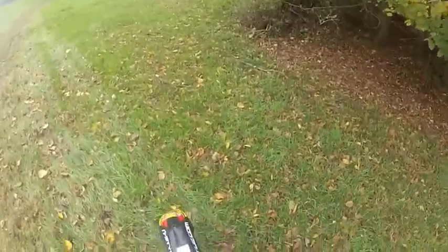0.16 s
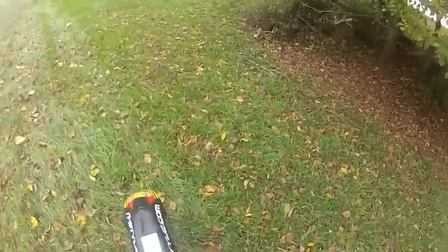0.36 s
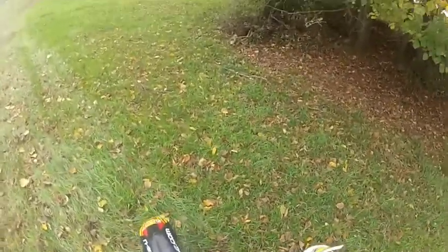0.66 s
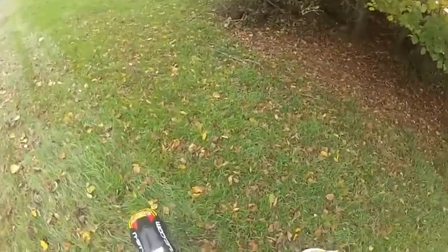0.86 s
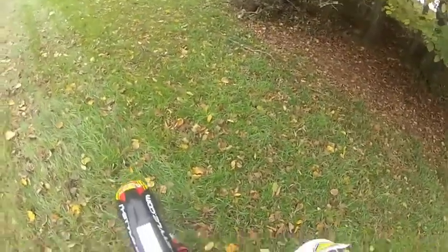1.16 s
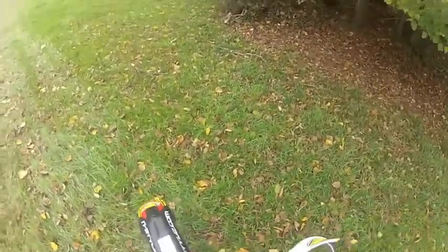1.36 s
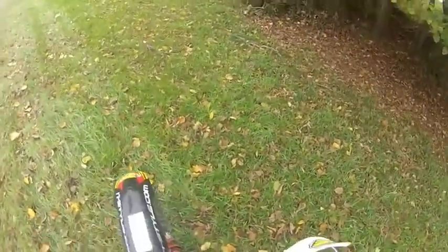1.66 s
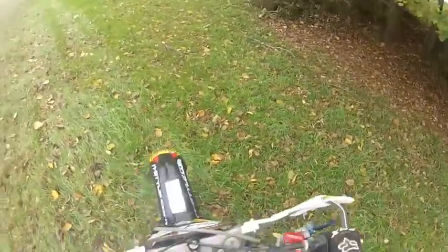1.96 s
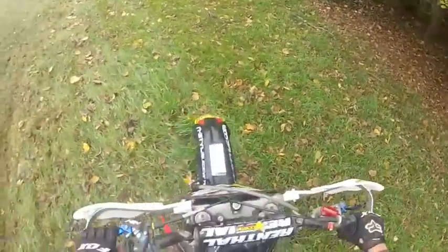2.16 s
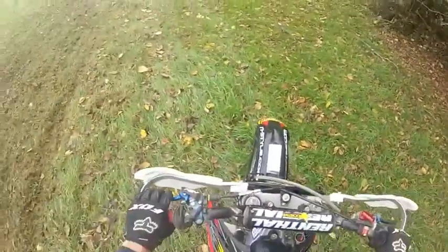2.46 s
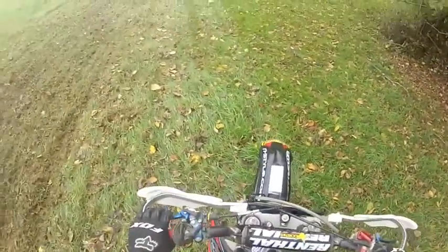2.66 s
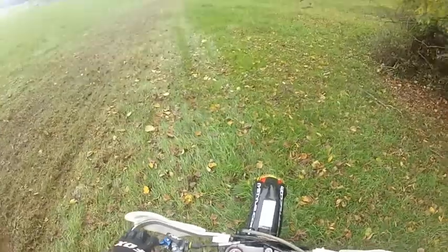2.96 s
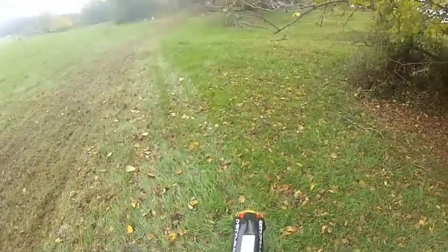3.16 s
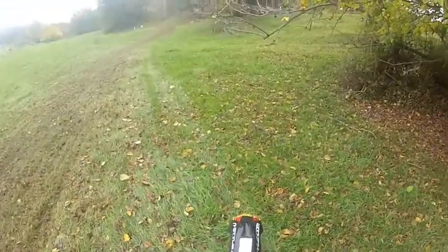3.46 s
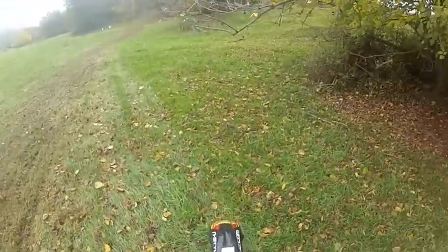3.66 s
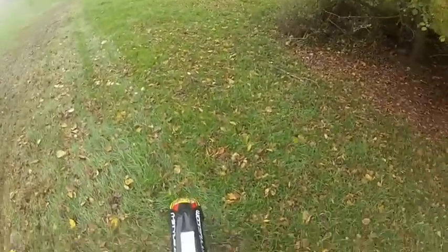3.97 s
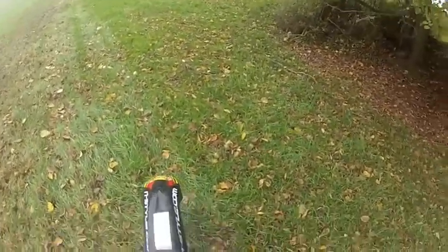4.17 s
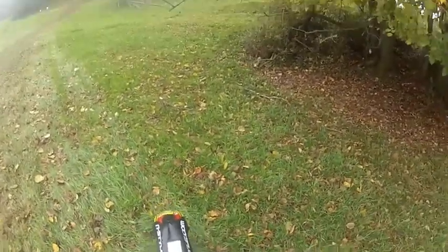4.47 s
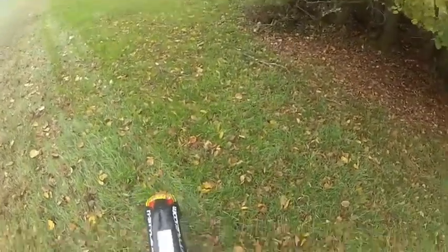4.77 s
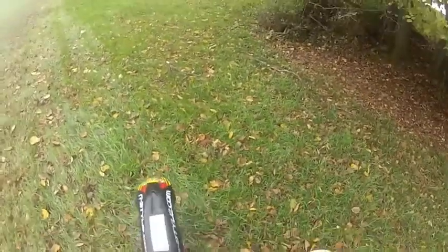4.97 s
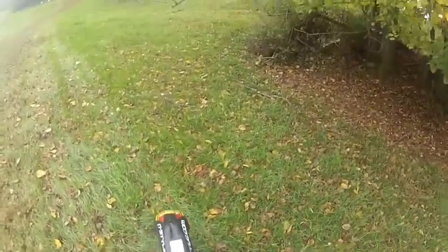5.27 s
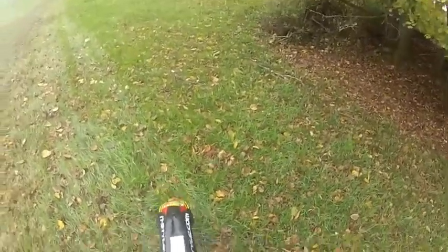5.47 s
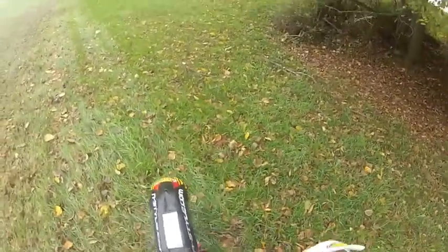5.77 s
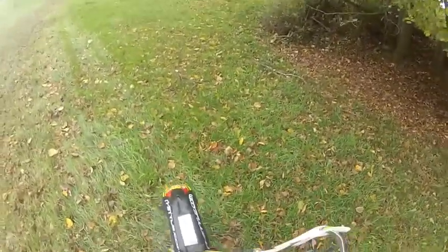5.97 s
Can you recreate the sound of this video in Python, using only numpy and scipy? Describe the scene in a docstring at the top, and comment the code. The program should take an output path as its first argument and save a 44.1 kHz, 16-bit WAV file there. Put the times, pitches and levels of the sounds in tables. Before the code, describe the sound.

A dirt bike's kick-starter is stamped in two sets of three strokes, knocking and whirring harshly, but the engine never fires.

```python
"""Kick-starting a dirt bike

A rider stamps on the kick-starter of a two-stroke bike in an open field; the engine never fires.
Each stroke brings a noise rumble and gear whirr; the helmet camera's mount knocks, ringing case and shell
as decaying modes with noise cracks and thuds. Filtered noise bursts make lever clacks, metal ticks and
dull bumps. Hard jolts boom in low helmet modes, and faint outdoor air is noise that wavers in level."""
import sys
import numpy as np
from scipy import signal
from scipy.fft import irfft
from scipy.io import wavfile
from scipy.ndimage import uniform_filter1d

SR = 44100
rng = np.random.default_rng(int(sys.argv[2]) if len(sys.argv) > 2 else 0)


def bounce(signal):
    """Save signal as a 16-bit WAV file at the path given by the first command-line argument."""
    frames = np.transpose(np.atleast_2d(signal))
    limited = np.clip(frames, -1, 1)
    pcm = np.round(limited * 32767).astype(np.int16)
    wavfile.write(sys.argv[1], SR, pcm)


N = 269892
T = np.arange(N) / SR
HIT = T[:16384]  # time axis of one short sound, in seconds

# Outdoor air. Each row: frequency in Hz, relative density in dB per Hz.
AIR_SPECTRUM = [(20, -2), (60, -2), (100, 0), (170, -5), (300, -11), (500, -18), (800, -20), (1600, -17),
                (3000, -18), (4500, -25), (7000, -30), (15000, -33)]
# Resonances and dips of the case on steady sounds. Each row: centre in Hz, width in Hz, gain in dB.
CASE_COLOUR = [(1310, 110, 9), (2300, 180, 6), (3650, 300, 6), (5950, 550, -10), (8350, 300, 8),
               (9750, 600, 5), (12050, 950, -10), (14300, 600, 5)]
AIR_DB = -52.3  # rms before the waver

# Strokes of the kick-starter. Each row: start of full force in seconds, hold in seconds, force in dB.
KICK_STROKES = [(0.351, .13, -32), (1.13, 0.016, -32.5), (1.719, 0.11, -33), (4.118, 0.19, -33),
                (4.9, 0.13, -32), (5.68, 0.073, -32.5)]
# The force builds as the foot comes down and dies as the springs settle.
RISE_DB_PER_S, FALL_DB_PER_S = 187, 145.5
# Shudder of the bike. Each row: frequency in Hz, relative density in dB per Hz.
SHUDDER_SPECTRUM = [(15, -2.5), (36, 11.5), (55, 0.5), (85, 3.5), (130, 1.5), (200, -17), (290, -16.5),
                    (450, -25), (900, -60)]
# Turning gears. Each row: frequency in Hz, relative density in dB per Hz.
WHIRR_SPECTRUM = [(300, 5), (600, -7.5), (1300, 3.5), (2300, 1.5), (3700, -7.5), (5000, -13.5), (8300, -12),
                  (15000, -14)]

# Knocks of the mount. Each row: time in seconds, sharp case ring in dB, dull shell ring in dB, before trims.
MOUNT_KNOCKS = [(0.0847, -32.5, -35.5), (0.3423, -15.5, -22), (0.385, -13, -18), (0.423, -25.5, -23),
                (0.4509, -26, -26), (0.836, -36.5, -33.5), (1.0227, -26.5, -29.5), (1.203, -36, -36),
                (1.2344, -29, -25), (1.257, -36, -40), (1.3114, -14.5, -39), (1.3473, -35.5, -36.5),
                (1.504, -34.5, -28), (1.6613, -23.5, -21.5), (1.6891, -26, -31), (1.7142, -29, -20.5),
                (1.726, -12.5, -24), (1.7462, -36, -30), (1.7642, -23, -18), (1.8272, -22, -17),
                (1.838, -12, -15.5), (1.8765, -18, -28), (1.9075, -36.5, -36.5), (2.0977, -31, -32.5),
                (2.204, -46.5, -46.5), (2.6529, -35.5, -47), (2.7229, -37.5, -39), (2.859, -42.5, -47.5),
                (3.8658, -32, -31), (4.079, -24, -27), (4.1185, -18, -22.5), (4.149, -25, -14),
                (4.1628, -14, -20), (4.2127, -29, -32.5), (4.2437, -33, -23), (4.28, -32, -36),
                (4.323, -35, -23.5), (4.642, -31, -29.5), (4.8647, -16.5, -14), (4.8918, -11, -16.5),
                (4.9353, -14.5, -18), (4.9617, -21.5, -14.5), (4.9841, -17, -19.5), (5.026, -26.5, -20),
                (5.0517, -20.5, -26.5), (5.4352, -38, -31.5), (5.6231, -21, -24), (5.6799, -15, -20.5),
                (5.704, -24, -14), (5.742, -22.5, -26.5), (5.7694, -18, -15.5), (5.7901, -18.5, -22.5),
                (6.0988, -53, -38)]
# Modes of the plastic case. Each row: frequency in Hz, 60 dB decay in seconds, relative level in dB.
CASE_MODES = [(1199, 0.023, -6), (1282, 0.048, -13), (1780, 0.024, -3), (1815, 0.032, -11.5),
              (2273, 0.016, -0.5), (2590, 0.011, -11.5), (2940, 0.014, -19), (3625, 0.022, -10.5),
              (5230, 0.018, -30.5), (6880, 0.021, -34.5)]
# Treble modes of the case. Each row: frequency in Hz, 60 dB decay in seconds, relative level in dB.
TREBLE_MODES = [(8340, 0.027, -4), (9670, 0.017, 2), (10160, 0.028, -2), (10630, 0.036, -7),
                (13250, 0.015, -17), (13820, 0.024, -5), (14270, 0.017, -2)]
# Modes of the helmet shell. Each row: frequency in Hz, 60 dB decay in seconds, relative level in dB.
SHELL_MODES = [(571, .1, 0), (630, .06, -5), (683, .09, -1), (790, .05, -7), (898, .08, -5),
               (1010, .05, -7), (1221, .06, -4), (1290, .05, -5), (1389, .06, -5), (1817, .06, -12),
               (2331, .06, -13), (2500, .05, -12), (3658, .06, -22)]
# Crack of a knock. Each row: frequency in Hz, relative density in dB per Hz.
CRACK_SPECTRUM = [(400, -4.5), (700, -1), (1000, -5), (1250, 12.5), (1520, -7), (1780, 4.5), (2100, 1.5),
                  (2450, -17), (3100, -13), (3650, -8.5), (4400, -24), (6000, -35), (8000, -26),
                  (15000, -19)]
# High sizzle of a knock. Each row: frequency in Hz, relative density in dB per Hz.
SIZZLE_SPECTRUM = [(5000, -56.5), (7600, -43.5), (8350, -17), (9000, -0.5), (10500, 7), (11600, 1.5),
                   (13800, 12.5), (15500, -59.5)]
# Low thud of a knock. Each row: frequency in Hz, relative density in dB per Hz.
THUD_SPECTRUM = [(30, -8), (70, 2.5), (160, 11), (230, -1.5), (290, 4), (380, -9.5), (500, -14), (900, -59)]
# Crack, treble and sizzle in dB against the case level of each knock.
CRACK_DB, TREBLE_DB, SIZZLE_DB = -8.5, -11.5, -24.5
# The thud follows the shell level but grows more slowly: offset in dB, growth in dB per dB.
THUD_DB, THUD_GROWTH = -10.5, .8

# Ticks and scrapes of loose metal. Each row: time in seconds, level in dB before the trim.
METAL_TICKS = [(0.1414, -47.5), (0.27, -43), (0.4135, -45), (0.854, -44), (0.95, -45), (1.0311, -44.5),
               (1.456, -45), (1.582, -47), (3.883, -44), (4.041, -43.5), (4.601, -48), (4.799, -44.5),
               (5.1055, -49.5), (5.286, -54.5), (5.394, -52.5), (5.5431, -41), (5.9314, -44),
               (6.023, -55.5)]
# Loose metal. Each row: frequency in Hz, relative density in dB per Hz.
METAL_SPECTRUM = [(1000, -11), (3600, -4), (4200, -9.5), (5050, 1.5), (5500, -0.5), (5950, -28),
                  (6500, -2.5), (7200, -5), (8000, -12), (10000, -18), (12000, -28), (14500, -27)]
TICK_S = 0.018  # time until the parts come to rest

# Mount rattle: touches per second at full force, spread of sizes, level against the stroke.
RATTLE_PER_S, RATTLE_SPREAD_DB, RATTLE_DB = 51, 2, -8

# Clacks of the lever at the end of its travel. Each row: time in seconds, level in dB before the trim.
LEVER_CLACKS = [(0.451, -24), (1.127, -24.5), (1.793, -20), (4.223, -25), (5.001, -24), (5.7419, -21.5)]
# Steel lever. Each row: frequency in Hz, relative density in dB per Hz.
LEVER_SPECTRUM = [(300, -2), (900, -10), (1600, -3), (2300, 5), (3050, -11), (3700, -3.5), (5100, -10.5),
                  (5950, -25.5), (6900, -13), (9700, -11), (11200, -22), (12700, -29), (14300, -12),
                  (16000, -34)]

# Dull bumps of the helmet. Each row: time in seconds, level in dB before the trim.
HELMET_BUMPS = [(0.511, -22.5), (0.611, -31.5), (1.119, -28.5), (1.193, -28.5), (4.262, -18),
                (4.362, -26.5), (5.034, -16), (5.129, -27.5)]
# Dull bump. Each row: frequency in Hz, relative density in dB per Hz.
BUMP_SPECTRUM = [(60, -22.5), (150, 5.5), (220, 9.5), (300, 13.5), (380, -23), (600, -4), (1200, -38)]

# Jolts that boom the helmet. Each row: time in seconds, gain on the wobble in dB, push time in seconds.
HELMET_JOLTS = [(0.969, -32.5, 0.014), (1.312, -12.5, 0.0042), (1.354, -12, 0.021), (1.457, -20, 0.007),
                (1.502, -25, 0.016)]
# Low modes of the helmet. Each row: frequency in Hz, 60 dB decay in seconds, relative level in dB.
HELMET_MODES = [(93.8, 0.23, 8), (125, 0.052, 15.5), (193, 0.053, -9)]
# Ring of a small metal part. Each row: frequency in Hz, 60 dB decay in seconds, level in dB.
PING_MODES = [(11909, .55, -53), (12091, .55, -53)]

TOP_HZ = 15400  # upper edge of the camera's sound


def undb(db):
    """Turn decibels into gain."""
    return 10 ** (np.asarray(db) / 20)


def add(out, s, sound):
    """Mix a sound in from time s, in seconds."""
    start = max(int(s * SR), 0)
    out[start:start + len(sound)] += sound[:len(out) - start]


def fade(t, t60):
    """Decay exponentially, 60 dB down after t60 seconds."""
    return np.exp(-np.log(1000) * t / t60)


def swell(t, rise):
    """Ease in from silence over about `rise` seconds."""
    return 1 - np.exp(-(t / rise) ** 2)


def level(x, db, size):
    """Scale a sound so that its loudest stretch of `size` samples has the given rms."""
    loudest_power = uniform_filter1d(x ** 2, size, mode="constant").max()
    return x * undb(db) / np.sqrt(loudest_power)


def noise(spectrum, size, peaks=()):
    """Shape random-phase noise of rms 1 by a spectrum and optional resonances."""
    hz = np.maximum(np.fft.rfftfreq(size, 1 / SR), 1)
    point_hz, point_db = np.transpose(spectrum)
    gain_db = np.interp(np.log(hz), np.log(point_hz), point_db)
    for centre, width, db in peaks:
        gain_db = gain_db + db * np.exp(-((hz - centre) / width) ** 2)
    phase = np.exp(2j * np.pi * rng.random(len(hz)))
    x = irfft(undb(gain_db) * phase, size)
    return x / x.std()


def burst(spectrum, rise, t60):
    """Dense modes heard as coloured noise that builds up and dies away."""
    return noise(spectrum, len(HIT)) * swell(HIT, rise) * fade(HIT, t60)


def ring(modes, scatter_db, detune):
    """Modes rung by one contact start together; each contact weights them differently."""
    hz, t60, db = np.transpose(modes)[:, :, None]
    weight, pitch, turn = rng.standard_normal((3, len(modes), 1))
    mode_hz = hz * (1 + detune * pitch)
    swing = np.cos(2 * np.pi * (mode_hz * (HIT - .0005) + 0.13 * turn))
    gain = undb(db + scatter_db * weight)
    return (gain * fade(HIT, t60) * swing).sum(0) * swell(HIT, 0.00076)


def chatter(modes, touch_db, seat_s):
    """The loose joint touches lightly, then seats with a blow that is harder on average."""
    out = undb(touch_db) * ring(modes, scatter_db=2.5, detune=0.0082)
    seat = ring(modes, scatter_db=2.0, detune=0.002)
    add(out, seat_s * rng.uniform(.75, 1.272), seat)
    return out


def air():
    """Faint outdoor air wavers a little, coloured by the resonances of the case."""
    knots = np.linspace(0, T[-1], 40)
    waver_db = np.interp(T, knots, rng.standard_normal(len(knots)))
    return undb(AIR_DB + waver_db) * noise(AIR_SPECTRUM, N, CASE_COLOUR)


def stroke_effort():
    """Force on the bike rises, holds and falls away by the same law in every stroke."""
    effort = np.zeros(N)
    for s, hold, db in KICK_STROKES:
        early = np.maximum(s - T, 0)
        late = np.maximum(T - s - hold, 0)
        effort += undb(db - RISE_DB_PER_S * early - FALL_DB_PER_S * late)
    return effort


def shudder(effort):
    """The bike shudders on its springs in a low rumble as the engine turns over without firing."""
    rumble = noise(SHUDDER_SPECTRUM, N)
    # even out chance swells so that the weight of the stroke sets the strength
    steady = rumble / np.sqrt(uniform_filter1d(rumble ** 2, size=3000))
    return undb(4.0) * effort * steady


def whirr(effort):
    """The turning gears whirr faintly, made gritty by tiny contacts of uneven size."""
    sizes = undb(0.71 * rng.standard_normal(N))
    contacts = (rng.random(N) < 260 / SR) * sizes  # about 260 a second
    grit = signal.lfilter([1], [1, -np.exp(-1 / (0.0063 * SR))], contacts)
    gears = noise(WHIRR_SPECTRUM, N, CASE_COLOUR) * (.5 + grit)
    return undb(-36.5) * np.sqrt(effort) * gears


def knocks():
    """Each knock rings the case at once; the helmet shell answers more slowly, duller and longer."""
    out = np.zeros(N)
    for s, case_db, shell_db in MOUNT_KNOCKS:
        case = level(chatter(CASE_MODES, touch_db=-1, seat_s=0.00194), case_db - 0.5, size=88)
        crack = level(burst(CRACK_SPECTRUM, rise=0.00026, t60=0.064), case_db + CRACK_DB, size=88)
        treble = chatter(TREBLE_MODES, touch_db=-4.0, seat_s=0.00098)
        treble = level(treble, case_db + TREBLE_DB, size=88)
        sizzle = level(burst(SIZZLE_SPECTRUM, rise=0.0035, t60=0.086), case_db + SIZZLE_DB, size=256)
        shell = ring(SHELL_MODES, scatter_db=6, detune=0.011) * swell(HIT, 0.0047)
        shell = level(shell, shell_db - 9.0, size=512)
        thud_db = THUD_DB + THUD_GROWTH * shell_db
        thud = level(burst(THUD_SPECTRUM, rise=0.0027, t60=0.2), thud_db, size=768)
        add(out, s - .0011, case + crack + treble + sizzle + shell + thud)
    return out


def ticks():
    """Loose metal ticks and scrapes lightly, stopping as soon as the parts come to rest."""
    out = np.zeros(N)
    stop = np.exp(-(HIT / TICK_S) ** 2)
    for s, db in METAL_TICKS:
        scrape = burst(METAL_SPECTRUM, rise=0.00039, t60=0.34) * stop
        add(out, s - .001, level(scrape, db + 3.5, size=88))
    return out


def rattle(effort):
    """The shaken mount touches lightly at random, more often and harder under more force."""
    touches = rng.random(N) < RATTLE_PER_S / SR * effort / effort.max()
    sizes = effort * undb(RATTLE_SPREAD_DB * rng.standard_normal(N))
    touch = level(burst(CRACK_SPECTRUM, rise=0.00084, t60=0.039), RATTLE_DB, size=88)
    return signal.fftconvolve(touches * sizes, touch)[:N]


def clacks():
    """The steel lever hits its stop in a brief rattle and leaves a short hiss."""
    out = np.zeros(N)
    for s, db in LEVER_CLACKS:
        clatter = burst(LEVER_SPECTRUM, rise=0.0038, t60=0.05)
        hiss = undb(-15) * burst(LEVER_SPECTRUM, rise=0.0076, t60=0.15)
        add(out, s - .003, level(clatter + hiss, db - .5, size=128))
    return out


def bumps():
    """Softer shoves reach only the low, hollow modes of the helmet, heard as dull noise bursts."""
    out = np.zeros(N)
    for s, db in HELMET_BUMPS:
        bump = burst(BUMP_SPECTRUM, rise=0.0038, t60=0.082)
        add(out, s - .002, level(bump, db - 8.5, size=512))
    return out


def boom():
    """The helmet wobbles in low notes, pushed again as the rider lands; a metal part sings faintly."""
    out = np.zeros(N)
    t = T[:SR]
    wobble = np.zeros(SR)
    for hz, t60, db in HELMET_MODES:
        wobble -= undb(db) * fade(t, t60) * np.sin(2 * np.pi * hz * t)
    for s, db, push in HELMET_JOLTS:
        # a slow push barely stirs the modes that die quickly
        add(out, s, undb(db) * wobble * swell(t, push))
    hardest_s = max(HELMET_JOLTS, key=lambda jolt: jolt[1])[0]
    add(out, hardest_s, ring(PING_MODES, scatter_db=0, detune=0))
    return out


def scene():
    """Sum the layers dry, since open grass returns no echo."""
    effort = stroke_effort()
    steady = air() + shudder(effort) + whirr(effort)
    contacts = knocks() + ticks() + rattle(effort) + clacks()
    helmet = bumps() + boom()
    return (steady + contacts + helmet)[None]


def record(dry):
    """The camera rounds the highest peaks and cuts the top with a steep low-pass."""
    ceiling = .8
    rounded = dry / (1 + (dry / ceiling) ** 4) ** .25
    low_pass = signal.ellip(8, .2, 70, TOP_HZ, fs=SR, output="sos")
    return signal.sosfilt(low_pass, rounded)


dry = scene()
out = record(dry)
bounce(out)
```